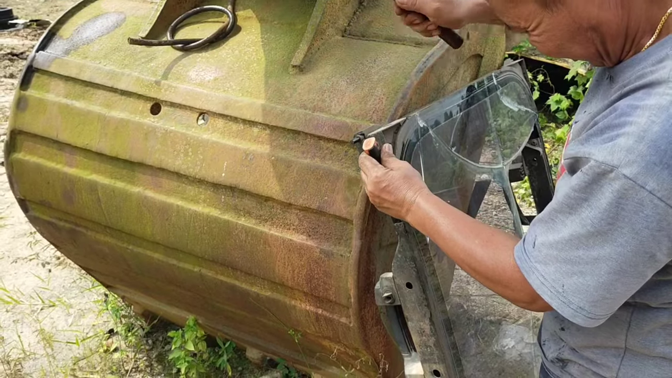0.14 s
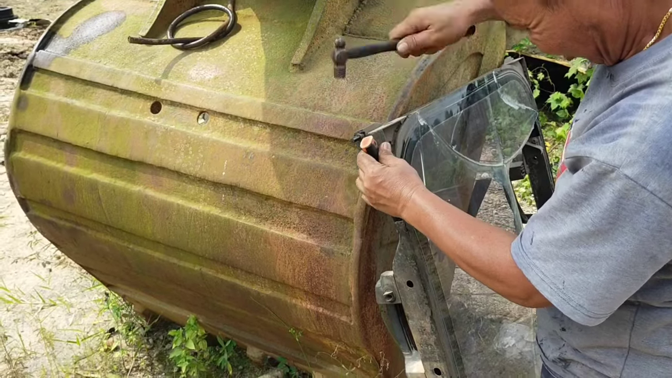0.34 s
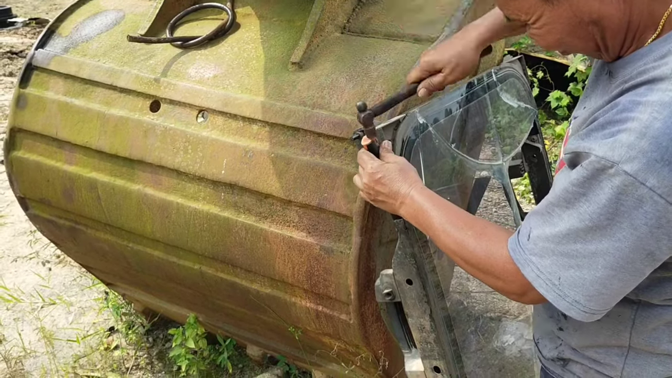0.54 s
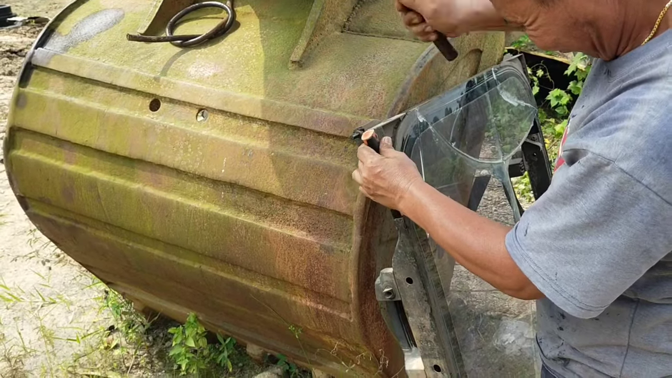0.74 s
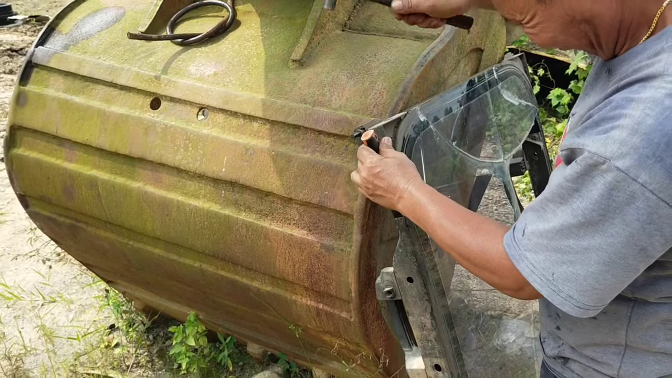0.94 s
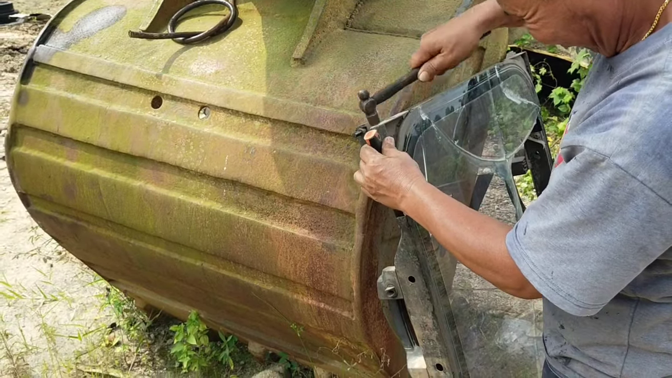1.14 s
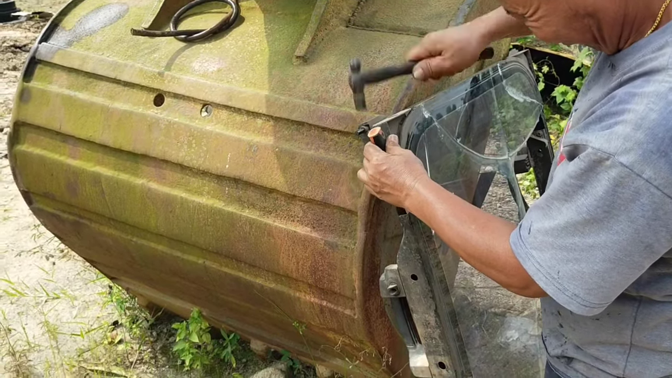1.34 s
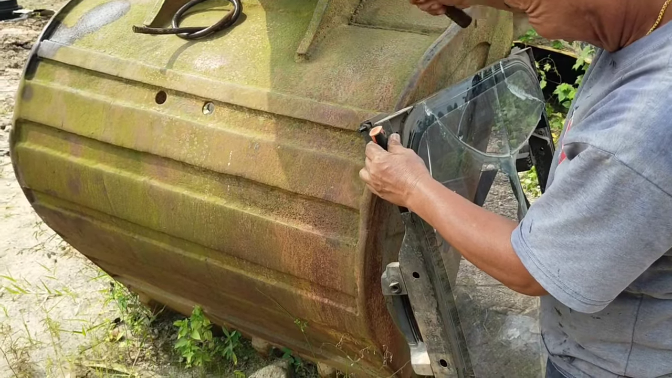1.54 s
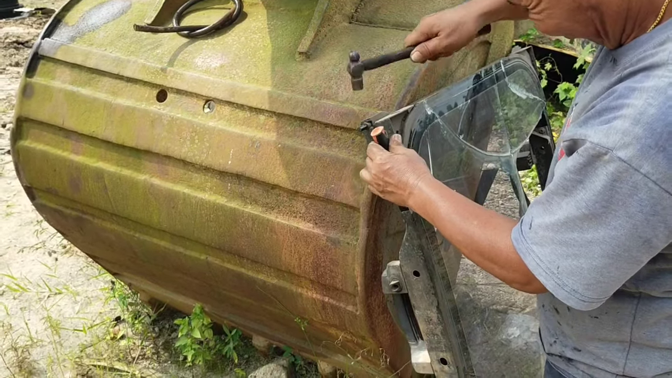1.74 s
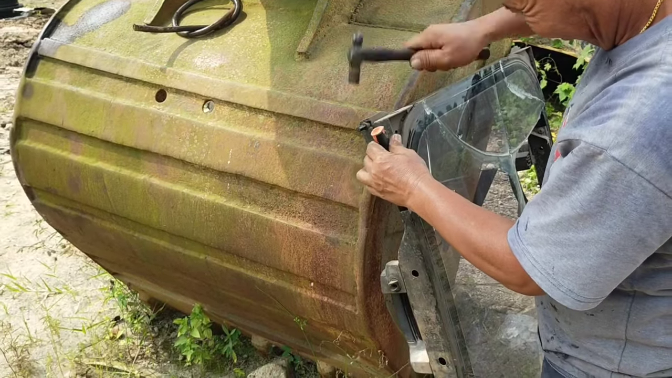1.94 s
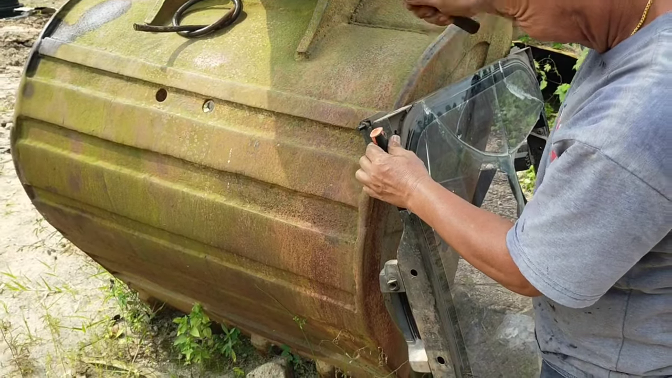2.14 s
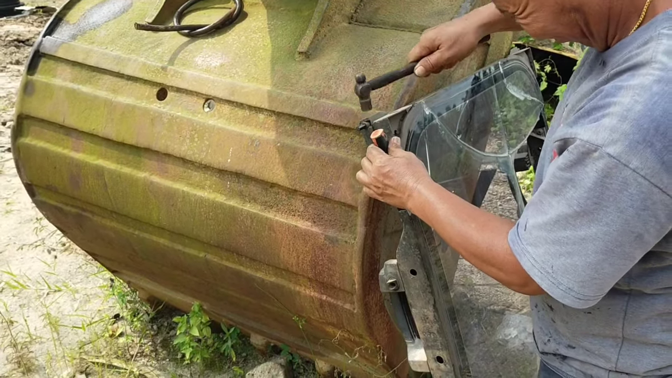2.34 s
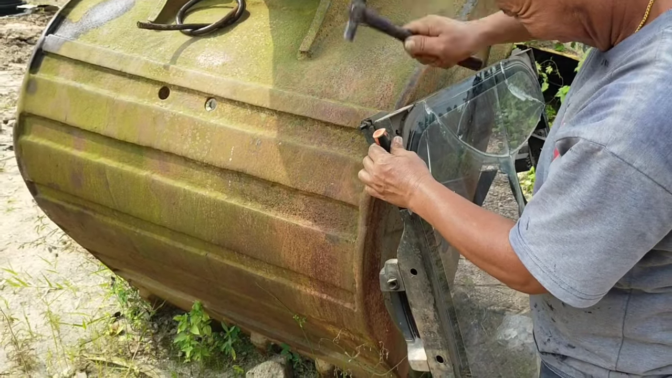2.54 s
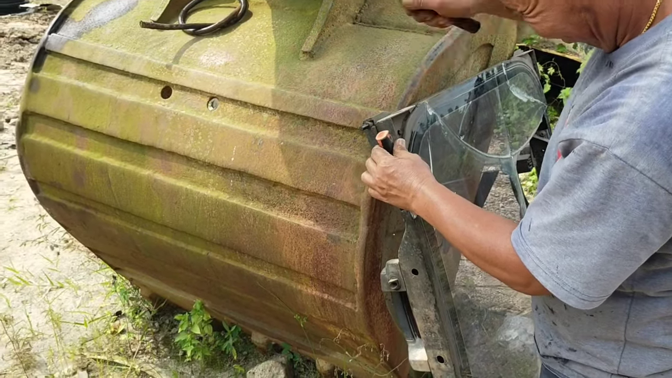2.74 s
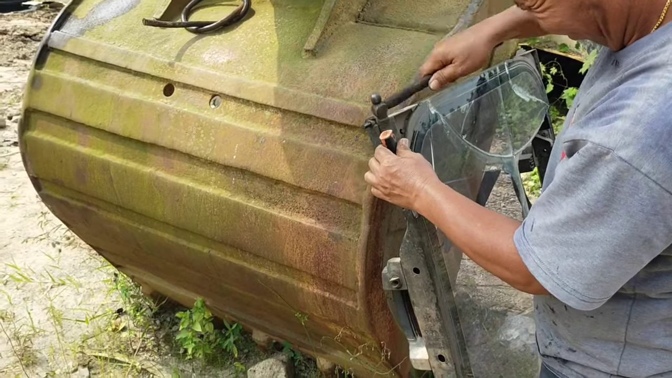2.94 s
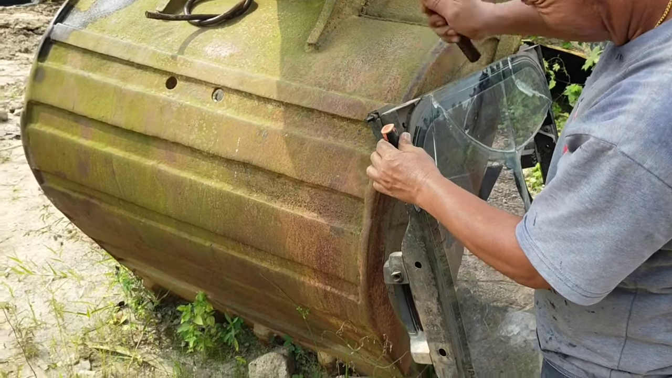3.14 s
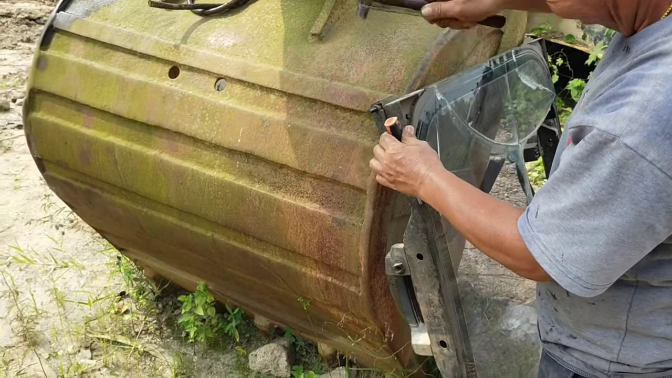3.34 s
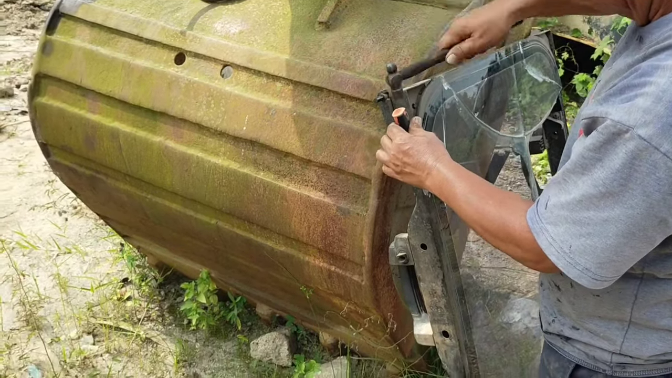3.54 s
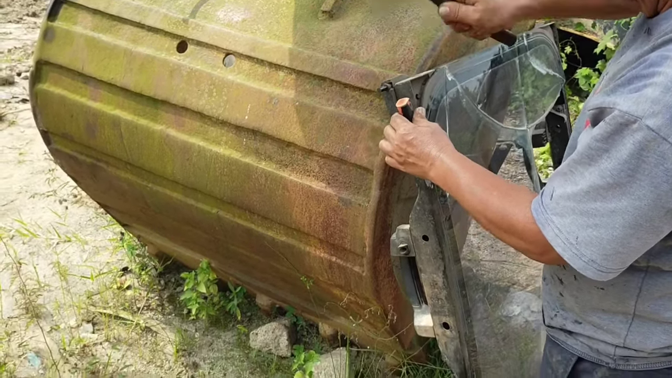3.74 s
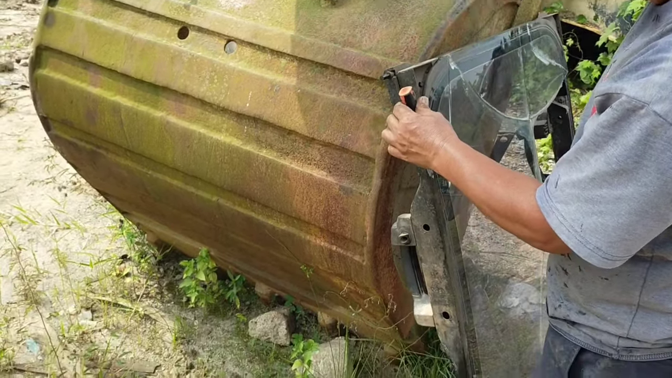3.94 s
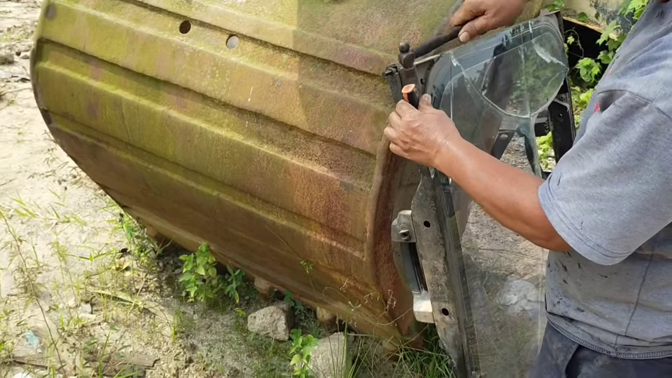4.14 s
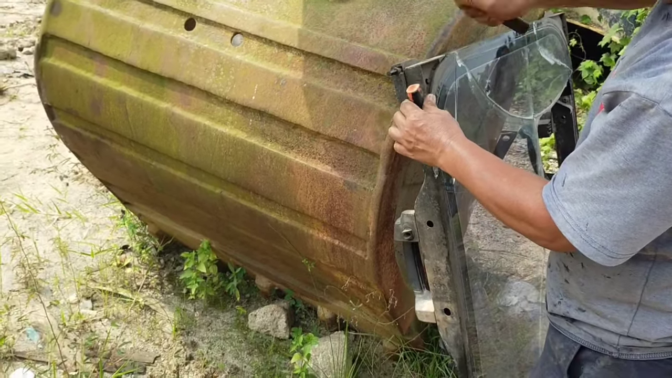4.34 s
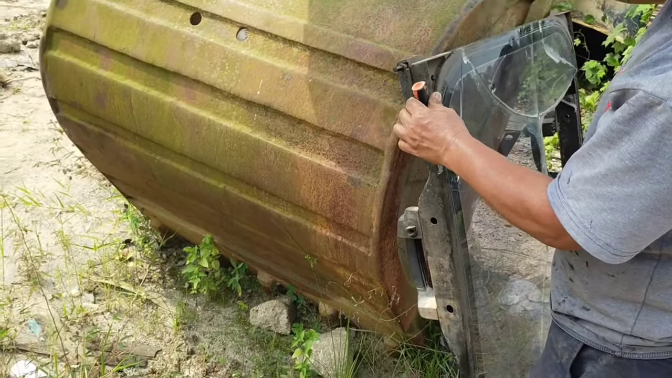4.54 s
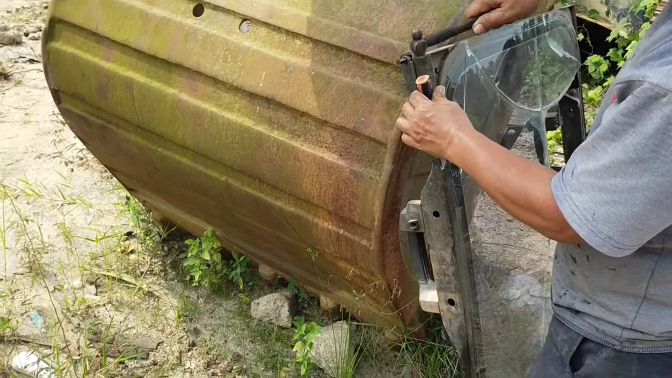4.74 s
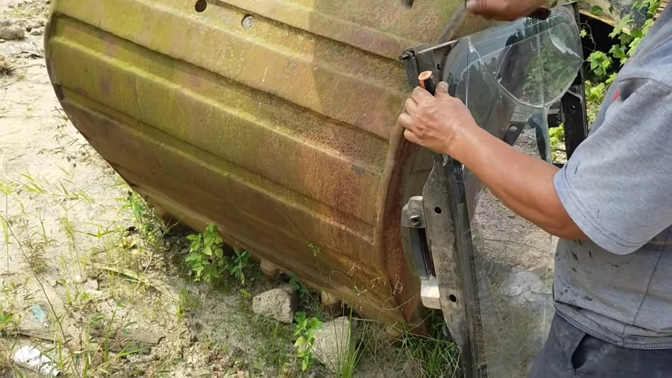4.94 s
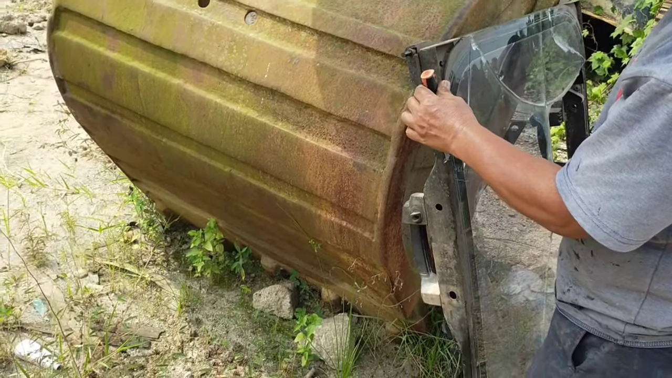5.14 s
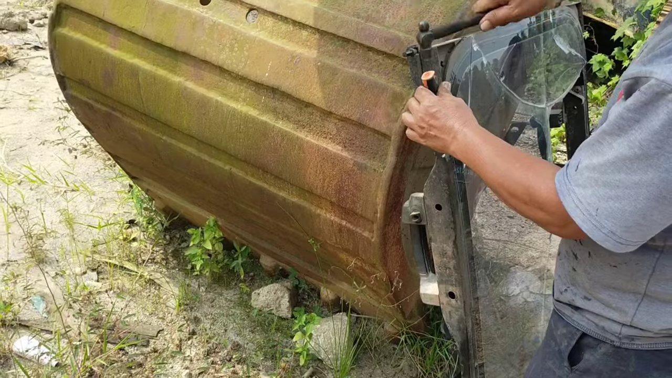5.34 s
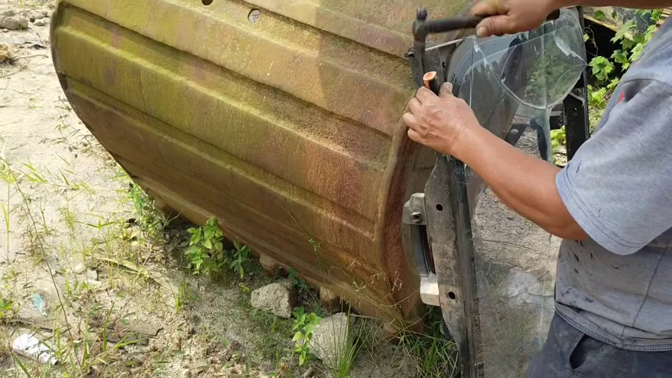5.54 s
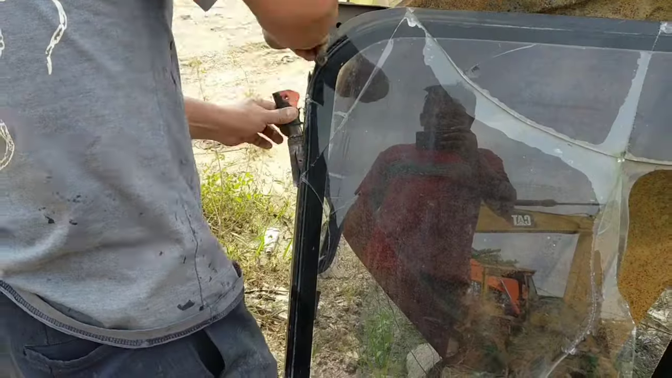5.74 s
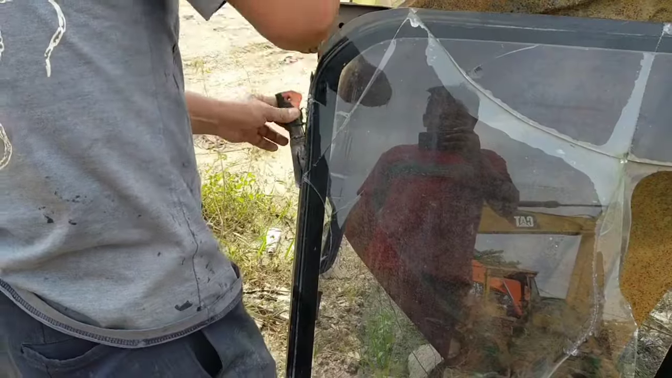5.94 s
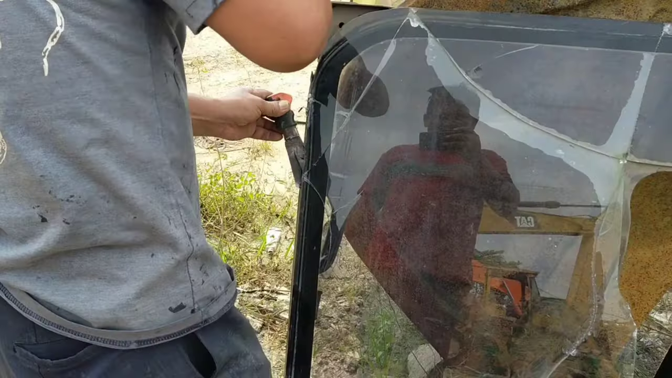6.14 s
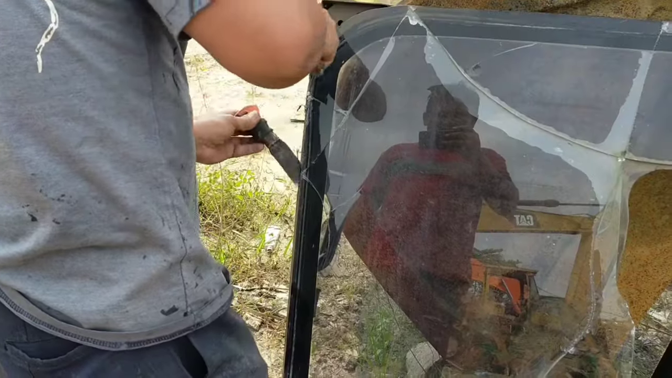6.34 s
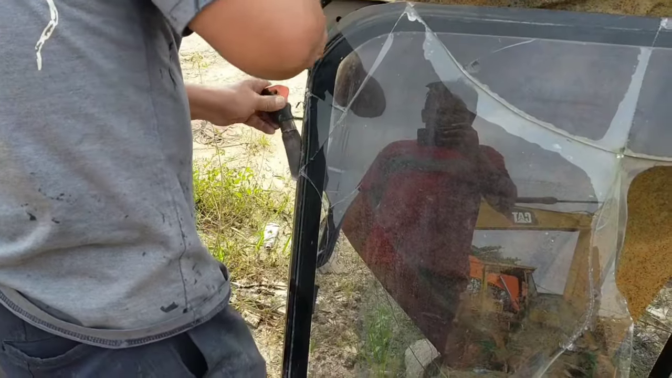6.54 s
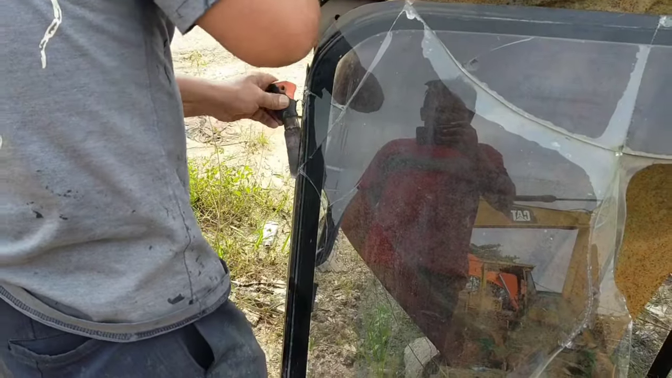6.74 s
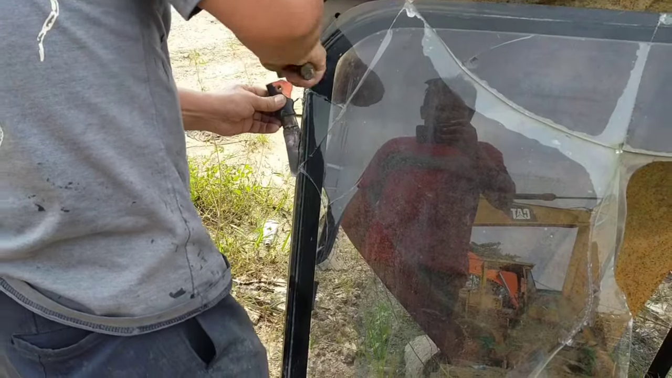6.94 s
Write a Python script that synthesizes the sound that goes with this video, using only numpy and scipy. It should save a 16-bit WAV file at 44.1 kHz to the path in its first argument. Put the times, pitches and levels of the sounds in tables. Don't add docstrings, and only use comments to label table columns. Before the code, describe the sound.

In an open yard, a small hammer drives a chisel along a steel frame. From about 0.15 s, sharp bright knocks come every 0.3 s or so, slightly uneven in strength. Each is a hard midrange crack with a very short metallic ring and a loose sheet rattle, followed by faint diffuse echoes about a tenth of a second later. The ring's tone shifts slightly as the chisel moves. Underneath, a diesel idles some way off, a low steady chug with broadband clatter and hiss that ducks briefly after every blow. Soft low wind buffets are strongest around 1.5 to 1.8 s. At about 5.8 s the sound cuts abruptly to a position nearer the engine; a final knock lands at 6.0 s. Until 7.1 s, there is only closer engine clatter with slight casing whine, and quiet hand scuffs, the clearest near 6.5 s.

```python
import sys
import numpy as np
from scipy import signal
from scipy.io import wavfile
from scipy.ndimage import uniform_filter1d

SR = 44100
rng = np.random.default_rng(int(sys.argv[2]) if len(sys.argv) > 2 else 0)


def linear_from_db(decibels):
    return 10 ** (np.asarray(decibels, float) / 20)


def log_audio(samples):
    frames = np.atleast_2d(samples).T
    limited = np.clip(frames, -1, 1)
    pcm = np.round(limited * 32767).astype(np.int16)
    wavfile.write(sys.argv[1], SR, pcm)


N = 312228
CUT_S = 5.822


def rms_one(x):
    return x / np.sqrt(np.mean(x ** 2) + 1e-20)


def in_time(rows):
    s, *columns = np.transpose(rows)
    return [np.interp(np.arange(N) / SR, s, c) for c in columns]


def at_hz(points, hz, column=1):
    points = np.array(points)
    return np.interp(np.log(hz), np.log(points[:, 0]), points[:, column])


def drift(rate_hz):
    r = np.exp(-2 * np.pi * rate_hz * 40 / SR)
    white = rng.standard_normal(N // 40 + 2002)
    slow = signal.lfilter([1], [1, -2 * r, r * r], white)[2000:]
    return np.interp(np.arange(N) / 40, np.arange(len(slow)), rms_one(slow))


def band_pass(order, low_hz, high_hz, x):
    return signal.sosfilt(signal.butter(order, [low_hz, high_hz], "band", fs=SR, output="sos"), x)


def bands(size, count):
    white = rng.standard_normal((2, size))
    edges = 17500 * 2 ** (-np.arange(count + 1) / 4)
    for k, (high, low) in enumerate(zip(edges, edges[1:])):
        yield np.sqrt(low * high), band_pass(2, low, high, white[k % 2])


def dying(t, t60):
    return linear_from_db(-60 * t / t60)


def resonate(x, hz, width_hz):
    r = np.exp(-np.pi * width_hz / SR)
    zeros = np.array([1, 0, -1]) * (1 - r * r) / 2
    return signal.lfilter(zeros, [1, -2 * r * np.cos(2 * np.pi * hz / SR), r * r], x)


# (multiple of firing rate [1], level [dB])
EXHAUST_FAR_ORDERS = [(5, 2.5), (6, 3.5), (7, 1), (8, -4), (10, -17), (11, -1.5), (12, -11), (16, -22),
                      (17, -8), (18, -18.5), (19, -12.5), (23, -12.5), (24, -19), (26, -6), (28, -21),
                      (29, -17), (30, -55), (32, -23), (33, -10.5), (34, -22)]
EXHAUST_NEAR_ORDERS = [(4, -12), (5, 3), (6, 5), (7, 0), (8, -5), (10, -4.5), (11, -3.5), (12, -7.5),
                       (13, -17), (15, -11), (21, -27), (22, -7.5), (23, -15), (26, -7.5), (29, -28),
                       (31, -14), (32, -7.5)]
FIRST_FIRINGS = [0.0368, 0.0345]
EXHAUST_LEVELS = [-55, -55]


def exhaust(orders, first_s, level_db, bounce, lag):
    firing_hz, bounce_s = 19.007, 0.0093
    turn = 2 * np.pi * firing_hz * (np.arange(N) / SR - first_s) + 0.075 * drift(3.5)
    thump = 0
    for k, db in orders:
        two_paths = np.angle(1 + bounce * np.exp(-2j * np.pi * k * firing_hz * bounce_s))
        thump = thump - linear_from_db(db) * np.cos(k * turn + two_paths - lag)
    return linear_from_db(level_db + 1 + 1.2 * drift(36.0)) * thump


# (frequency [Hz], density [dB per Hz])
YARD_FAR_SPECTRUM = [(60, -11), (110, -3), (200, -8), (320, -12.5), (700, -13.5), (1050, -14.5),
                     (1600, -9.5), (2700, -15.5), (3900, -23), (5200, -34), (7500, -28.5), (9500, -40),
                     (12000, -35), (15500, -35.5)]
YARD_NEAR_SPECTRUM = [(60, -8), (120, -9.5), (250, -15), (450, -17.5), (800, -16), (1600, -11), (2600, -13),
                      (3600, -19.5), (4500, -30.5), (5900, -36), (7500, -35.5), (9500, -40.5),
                      (12000, -32.5), (15500, -38)]
# (time [s], level [dB])
YARD_LEVEL = [(0, -46), (1.5, -46.5), (3, -47), (4.5, -48), (5.8, -48.5), (6.4, -47.5), (7.08, -48.5)]


def yard_noise(past_cut):
    far, near, together = 0, 0, drift(1.1)
    for centre, noise in bands(size=N, count=33):
        noise = noise * linear_from_db(0.67 * together + 2.05 * drift(10.0))
        far = far + linear_from_db(at_hz(YARD_FAR_SPECTRUM, centre)) * noise
        near = near + linear_from_db(at_hz(YARD_NEAR_SPECTRUM, centre)) * noise
    placed = np.where(past_cut, linear_from_db(2.5) * rms_one(near), rms_one(far))
    return linear_from_db(in_time(YARD_LEVEL)[0]) * placed


def eddies(low_hz, high_hz):
    band = band_pass(2, low_hz, high_hz, rng.standard_normal(N + SR))[SR:]
    power = uniform_filter1d(uniform_filter1d(band ** 2, size=3000), size=3000)
    return band / np.sqrt(power + 1e-12)


# (time [s], level [dB])
BREEZE_LEVEL = [(0, -54), (1.1, -50), (1.7, -54), (2.5, -47), (3.0, -52.5), (3.5, -56), (4.3, -52),
                (5.4, -55), (7.08, -57)]
# (middle [s], half length [s], deep sway [dB], puff [dB])
GUST_SWELLS = [(0.064, 0.055, -51, -66), (0.376, 0.066, -48, -63), (.62, .08, -44, -64),
               (0.686, .04, -50, -48), (0.964, 0.065, -49, -50), (1.175, .1, -47, -47.5),
               (1.483, 0.073, -43, -36), (1.638, 0.077, -31, -39), (1.784, 0.057, -55, -35),
               (1.979, 0.072, -38.5, -45.5), (2.078, 0.041, -49, -47.5), (2.318, 0.1, -45, -45),
               (2.58, 0.043, -43, -59), (2.89, 0.044, -47, -51), (3.214, 0.048, -53, -52),
               (4.406, 0.013, -60, -61), (5.687, 0.057, -47.5, -60), (6.196, 0.034, -58, -60),
               (7.004, .04, -61, -59)]


def gusts():
    t, breeze_db = np.arange(N) / SR, in_time(BREEZE_LEVEL)[0]
    lumps_db, puff_rel_db = -1, -4
    deep = linear_from_db(breeze_db + lumps_db * drift(4.6))
    strength = linear_from_db(breeze_db + puff_rel_db + lumps_db * drift(15.0))
    for s, half_s, deep_db, puff_db in GUST_SWELLS:
        swell = np.exp(-((t - s) / half_s) ** 2)
        deep = deep + linear_from_db(deep_db) * swell
        strength = strength + linear_from_db(puff_db) * swell
    puff = eddies(39.2, 80)
    flutter = linear_from_db(-13 + 1.5 * drift(16.0)) * eddies(95, 220)
    return deep * eddies(8.9, 33.2) + strength * (puff + flutter)


# (frequency [Hz], crack [dB per Hz], crack t60 [s], tail [dB per Hz], tail t60 [s])
SHEET_CLATTER = [(417, -56, 0.052, -21.5, 0.16), (710, -65, 0.029, -24, 0.15),
                 (1290, -73, 0.013, -14.5, 0.14), (2140, -36, 0.072, 1.5, 0.13),
                 (3210, -12, 0.038, -1.5, 0.1), (4000, -5, 0.046, -18.5, 0.13),
                 (4700, -6, 0.021, -24.5, 0.13), (6300, -5, 0.03, -34, 0.2), (8160, -4, 0.029, -35.5, 0.35),
                 (9360, -11.5, 0.03, -37, 0.18), (16000, -22, 0.039, -42.5, 0.19)]


def sheet_clatter(t, colour):
    rattle = linear_from_db(2.0 * np.interp(t, np.arange(50) * 0.00334, rng.standard_normal(50)))
    clatter = 0
    for centre, noise in bands(size=len(t), count=22):
        crack_db, crack_t60, tail_db, tail_t60 = [at_hz(SHEET_CLATTER, centre, column=c) for c in (1, 2, 3, 4)]
        crack = linear_from_db(crack_db) * dying(t, crack_t60)
        tail = linear_from_db(tail_db) * dying(t, tail_t60) * np.minimum(t / 0.003, 1)
        clatter = clatter + linear_from_db(at_hz(colour, centre)) * noise * (crack + rattle * tail)
    return clatter


def frame_modes(t, modes, colour, chatter_ms):
    free = np.maximum(t - chatter_ms / 1000, 0)
    hz, level_db, t60 = np.transpose(modes)
    nudge = rng.standard_normal((3, len(hz)))
    hz = hz * (1 + 0.011 * nudge[0])
    level = linear_from_db(level_db + at_hz(colour, hz) + 0.5 * nudge[1])
    start = np.pi * np.arange(1, len(hz) + 1) + 0.5 * nudge[2]
    fill_s = 0.051 * np.maximum(t60 - 0.065, 0)[:, None] + 1e-5
    swell = 1 - np.exp(-t / fill_s)
    decay = dying(free + 0.49 * (t - free), np.clip(0.96 * t60, 0.015, 0.14)[:, None])
    return level @ (swell * np.sin(2 * np.pi * hz[:, None] * t + start[:, None]) * decay)


def knock(modes, low_db, upper_db, bright_db, chatter_ms, air_db):
    t = np.arange(int(0.16 * SR)) / SR
    # (frequency [Hz], level [dB])
    colour = [(1100, low_db + 22.5), (1550, upper_db + 10.5), (2000, 0.0), (3500, 0.0),
              (5000, bright_db + 11.0), (8000, bright_db + 9), (12000, bright_db + 11.0 + air_db)]
    rings = frame_modes(t, modes, colour, chatter_ms)
    blow = (rings + linear_from_db(7.0) * sheet_clatter(t, colour)) * np.minimum(t / 0.00033, 1)
    return blow / np.abs(blow).max()


# (delay [s], level [dB], spread t60 [s])
REFLECTIONS = [
    (0.09, -22.5, 0.068),
    (.108, -28.5, 0.12),
    (.225, -34.5, 0.088),
]


def yard_echo():
    t = np.arange(int(0.36 * SR)) / SR
    response = 0
    for delay, level_db, t60 in REFLECTIONS:
        since = np.maximum(t - delay, 0)
        burst = rng.standard_normal(len(t)) * dying(since, t60) * np.minimum(since / 0.003, 1)
        response = response + linear_from_db(level_db) * burst / np.sqrt(np.sum(burst ** 2))
    response = band_pass(1, 1300, 5500, response)
    return response + linear_from_db(-2.5) * resonate(response, 2245, 250)


# (time [s], peak [dB], limiter duck [dB], relative boom [dB], chisel chatter [ms])
BLOWS = [(0.1489, -12, 4.5, -11, 4.7), (0.421, -14, 6, -9, 3.7), (0.6955, -12.5, 9, -10, 2.9),
         (0.9813, -11, 7.5, -8, 3.6), (1.2665, -11.5, 5, -8.2, 5.8), (1.5419, -11, 8.5, -12, 2.4),
         (1.8318, -13.5, 6, -8.5, 2.3), (2.1483, -11.5, 5, -5, 2.3), (2.448, -13.5, 7, -7.5, 5.6),
         (2.7567, -15, 8, -12.5, 1), (3.0736, -12.5, 5.5, -6.5, 6.6), (3.383, -10.5, 3, -5.5, 2.9),
         (3.6873, -13.5, 4, -11.5, 2.2), (3.9924, -12, 4, -10, 1.8), (4.2919, -13, 5, -3.5, 4.3),
         (4.5933, -12, 3.5, -4.5, 2.2), (4.8849, -11.5, 7, -5.5, 2.4), (5.1829, -15, 5, -3, 1.8),
         (5.4815, -13, 2, -5.5, 3.4), (5.7732, -12.5, 0.5, -5.5, 4), (5.988, -16, 8, -6.5, 7.5)]
SEAT_CHANGES = [1.4, 2.6, 2.9, 4.1, 5.3, 5.6, 5.9]
# (frequency [Hz], level [dB], t60 [s])
SEAT_A = [(935, -8.5, 0.013), (1064, -8.5, 0.026), (1497, 0, 0.015), (2010, -6, 0.083), (2100, -5, 0.029),
          (2588, 7.5, 0.026), (2820, -4.5, 0.024), (3074, -0.5, 0.034), (3980, -11, 0.039)]
SEAT_B = [(894, -15.5, 0.017), (1073, -9, 0.015), (1450, -13, 0.11), (1526, -2.5, 0.033), (2196, -4, 0.064),
          (2523, -1, 0.031), (2730, 1.5, 0.031), (3110, 3.5, 0.02), (3640, -7.5, 0.029),
          (4010, -8.5, 0.047)]
SEAT_C = [(430, -33, 0.018), (850, -22.5, 0.012), (1064, -15, 0.033), (1595, -1, 0.019),
          (1626, -9.5, 0.082), (2158, -7.5, 0.086), (2246, -11, 0.062), (2690, 3.5, 0.014),
          (2950, -7.5, 0.081), (3037, 0.5, 0.02), (3250, -6.5, 0.048), (4000, -9.5, 0.04)]
SEAT_D = [(460, -35, 0.038), (775, -31, 0.058), (1090, -13.5, 0.018), (1440, -38, 0.088), (1640, -11, 0.12),
          (2184, -4.5, 0.071), (2414, -9, 0.078), (2430, -30, 0.21), (2856, 2, 0.016), (3210, 3, 0.017),
          (3907, -5, 0.028), (4290, -25, 0.034)]
SEAT_E = [(431, -49, 0.033), (880, -23, 0.049), (1140, -18, 0.024), (1390, -9, 0.034), (2140, -5, 0.025),
          (2320, -5.5, 0.042), (2670, -18, .05), (3050, -2.5, 0.031), (3230, -6, 0.029), (3880, -8, 0.038)]
SEAT_F = [(280, -31.5, 0.18), (335, -30, 0.25), (630, -32, 0.068), (1110, -26, 0.075), (1270, -25, 0.056),
          (1750, -0.5, 0.02), (2067, -6, 0.084), (2270, -5, 0.045), (2450, -3.5, 0.047), (2670, -17, 0.054),
          (2980, -16, 0.045), (4070, -6.5, 0.02), (5250, -7, 0.023)]
SEAT_MODES = [SEAT_A, SEAT_B, SEAT_B, SEAT_C, SEAT_D, SEAT_E, SEAT_E, SEAT_F]
# (low boom [dB], brightness [dB], top sparkle [dB], echo [dB])
SEAT_RADIATION = [(-14, -6, -2, -0.2), (-11, -7, -2, -1.3), (-8, -6, 3.5, -2), (-8, -7, 2.5, -0.2),
                  (-10, -7.5, 5.5, 0.6), (-12, -11, 6.5, 2), (-11.5, -10, 4.5, .1), (-8.5, -15, 8, -1)]


def hammering():
    before, after = np.zeros((2, N + SR))
    for s, peak_db, duck_db, boom_db, chatter_ms in BLOWS:
        seat = np.searchsorted(SEAT_CHANGES, s)
        low_db, bright_db, air_db, echo_db = SEAT_RADIATION[seat]
        low_db = low_db + 0.4 * (boom_db + 6.5)
        blow = knock(SEAT_MODES[seat], low_db, boom_db, bright_db, chatter_ms, air_db)
        heard = linear_from_db(echo_db) * signal.fftconvolve(blow, yard_echo())
        heard[:len(blow)] += blow
        place = after if s > CUT_S else before
        first = round(s * SR)
        place[first:first + len(heard)] += linear_from_db(peak_db + duck_db + 2.0) * heard
    return before[:N] * (np.arange(N) < CUT_S * SR) + after[:N]


# (time [s], peak [dB], pitch [Hz], t60
# [s])
SCUFFS = [(5.707, -45, 4000, 0.044), (6.08, -40, 7300, .05), (6.082, -43, 5700, 0.043),
          (6.187, -38, 1710, 0.055), (6.468, -33, 2220, 0.11), (6.474, -48, 412, 0.06),
          (6.697, -45, 344, 0.19), (6.926, -42, 1690, 0.046), (7.03, -40, 1730, 0.037)]


def fidgets():
    out, t = np.zeros(N + SR), np.arange(int(0.12 * SR)) / SR
    for s, peak_db, hz, t60 in SCUFFS:
        puff = rng.standard_normal(len(t)) * dying(t, t60) * np.minimum(t / 0.0021, 1)
        scuff = resonate(resonate(puff, hz, hz / 8.0), hz, hz / 3.0)
        first = round(s * SR)
        out[first:first + len(t)] += linear_from_db(peak_db) * scuff / np.abs(scuff).max()
    return out[:N]


# (frequency [Hz], width [Hz], level [dB])
CASING = [(2550, 450, -52.5), (4000, 370, -65.5), (7540, 1300, -67)]


def whine():
    out = 0
    for hz, width_hz, level_db in CASING:
        band = resonate(resonate(rng.standard_normal(N), hz, width_hz), hz, width_hz)
        out = out + linear_from_db(level_db + 0.95 * drift(8.0)) * rms_one(band)
    return out


def scene():
    past_cut = np.arange(N) >= CUT_S * SR
    far = exhaust(EXHAUST_FAR_ORDERS, FIRST_FIRINGS[0], EXHAUST_LEVELS[0], bounce=0.85, lag=0.6)
    near = exhaust(EXHAUST_NEAR_ORDERS, FIRST_FIRINGS[1], EXHAUST_LEVELS[1], bounce=3.2, lag=0.6)
    knocks = hammering()
    engine = np.where(past_cut, near + whine(), far)
    return (knocks + engine + yard_noise(past_cut) + gusts() + fidgets())[None]


def limiter_gain():
    t, duck = np.arange(N) / SR, np.zeros(N)
    hold_s, let_go_s = 0.083, 0.028
    for s, _, duck_db, *_ in BLOWS:
        shape = np.interp(t - s, [-0.0075, -0.004, hold_s, hold_s + let_go_s], [0, 1, 1, 0])
        duck += duck_db * shape * ((t < CUT_S) | (s > CUT_S))
    return linear_from_db(-duck)


def roll_off(x):
    return signal.sosfilt(signal.butter(12, 16990, fs=SR, output="sos"), x)


def record(dry):
    held = 0.3 * np.tanh(dry * limiter_gain() / 0.29)
    top_hz = 16000
    shelf = signal.ellip(8, 0.5, 30, top_hz - 230, fs=SR, output="sos")
    wall = signal.cheby2(12, 60, top_hz + 1250, fs=SR, output="sos")
    finished = signal.sosfilt(np.vstack([shelf, wall]), held)
    return roll_off(finished)


dry = scene()
out = record(dry)
log_audio(out)
```